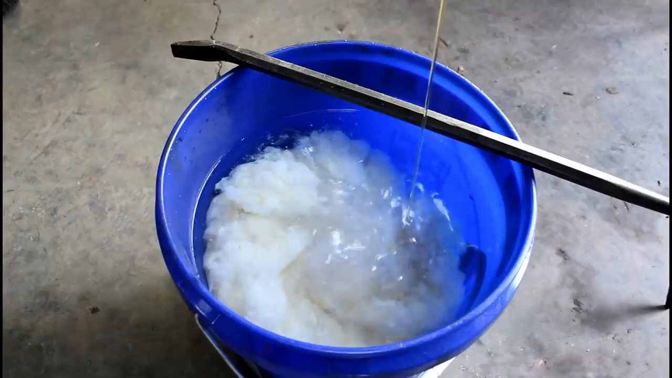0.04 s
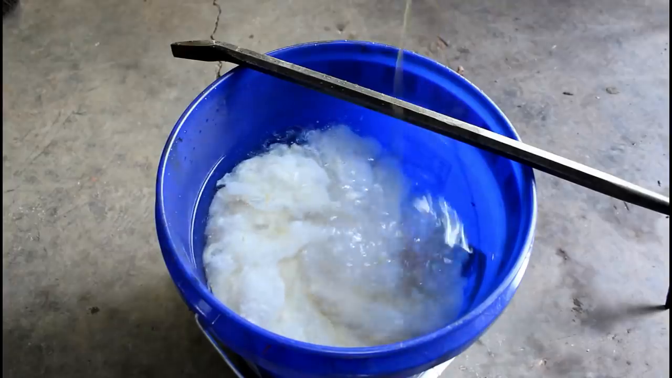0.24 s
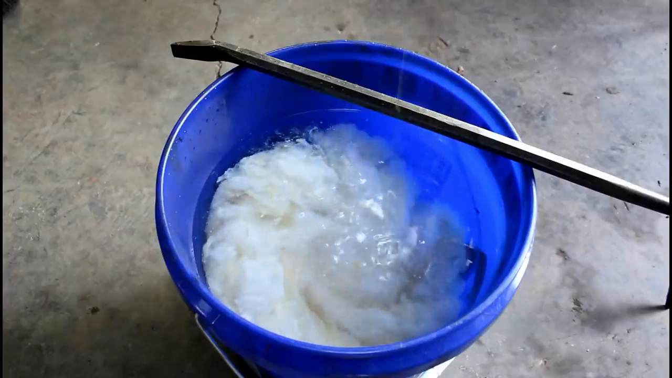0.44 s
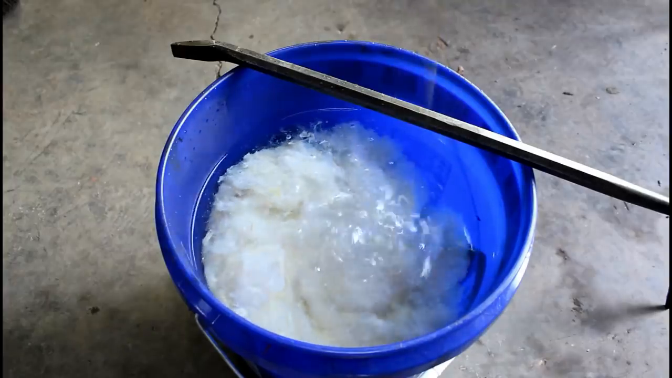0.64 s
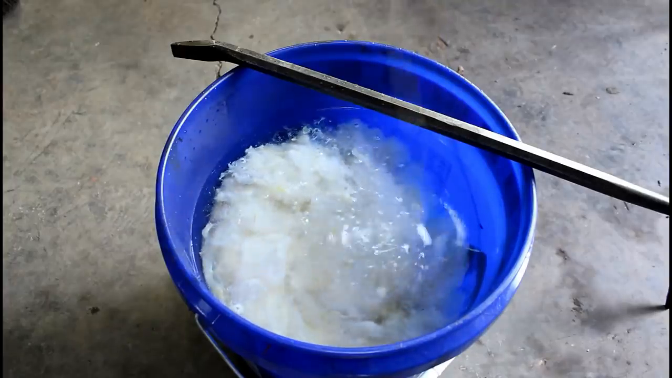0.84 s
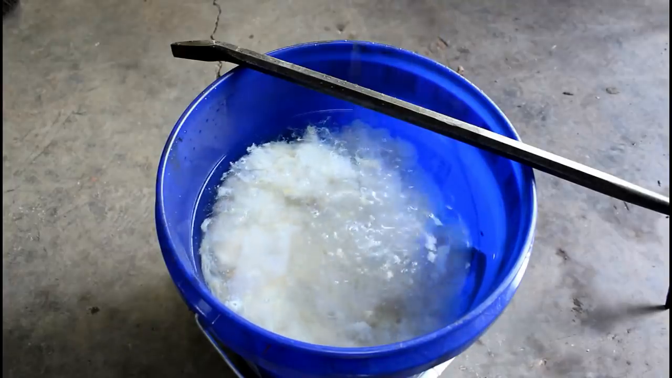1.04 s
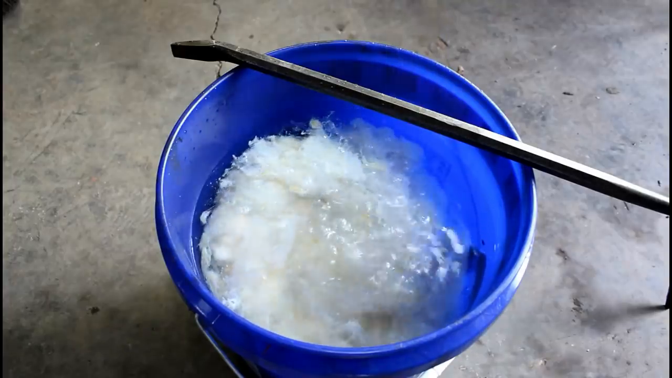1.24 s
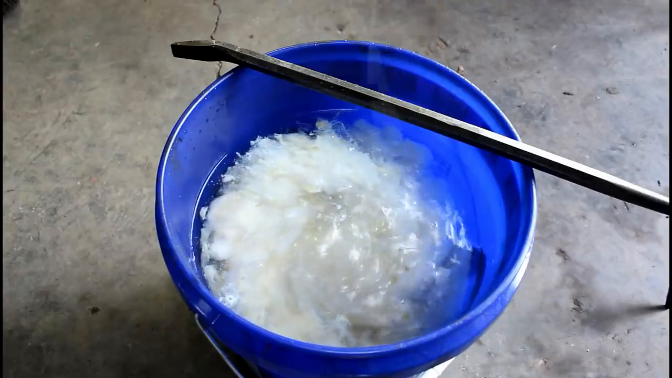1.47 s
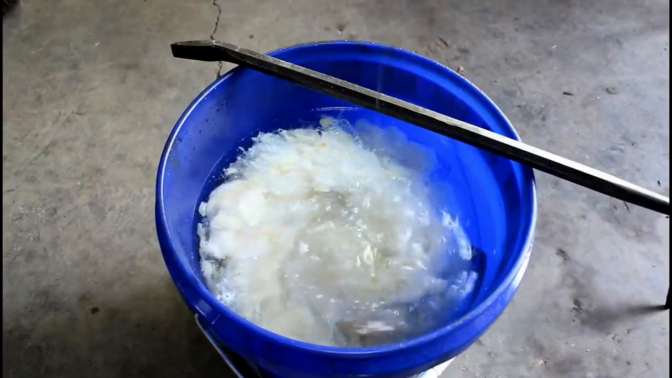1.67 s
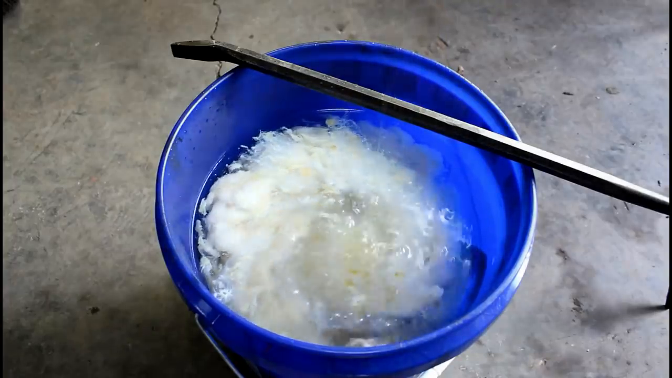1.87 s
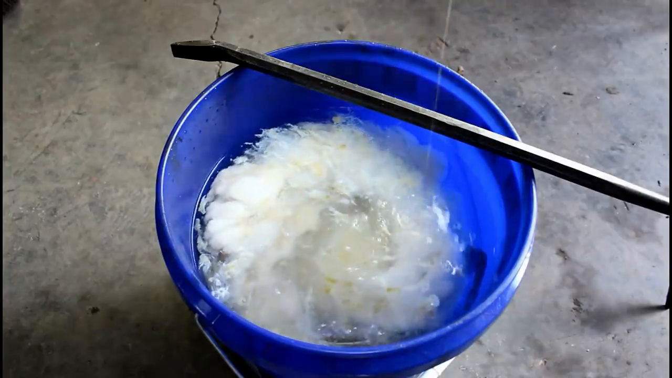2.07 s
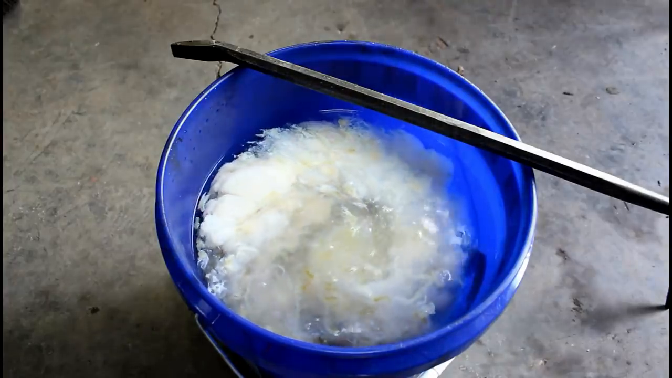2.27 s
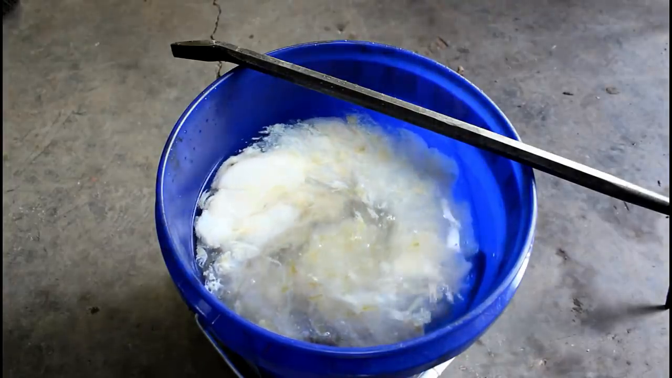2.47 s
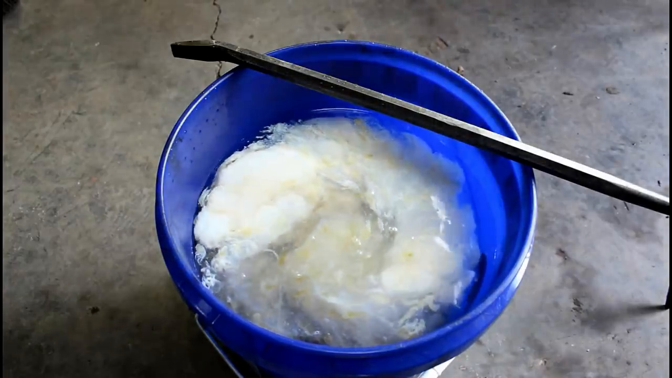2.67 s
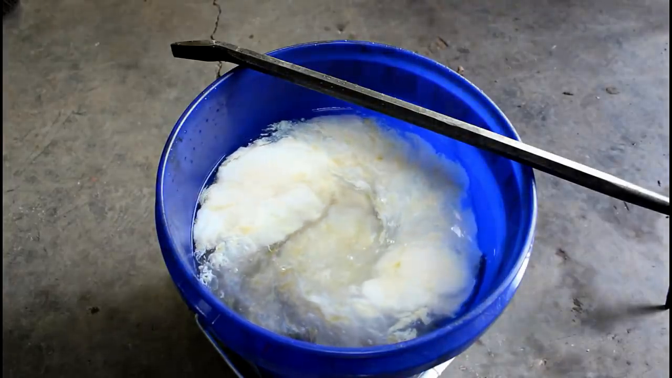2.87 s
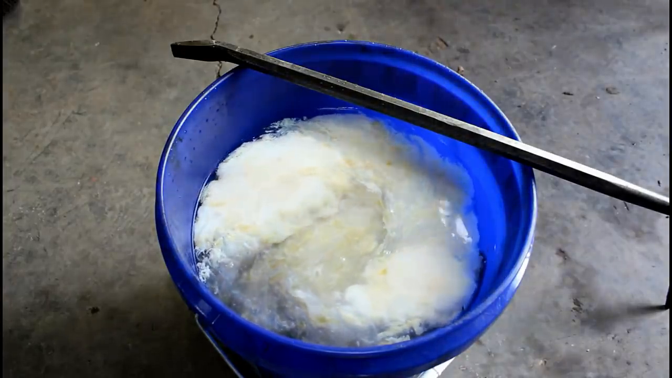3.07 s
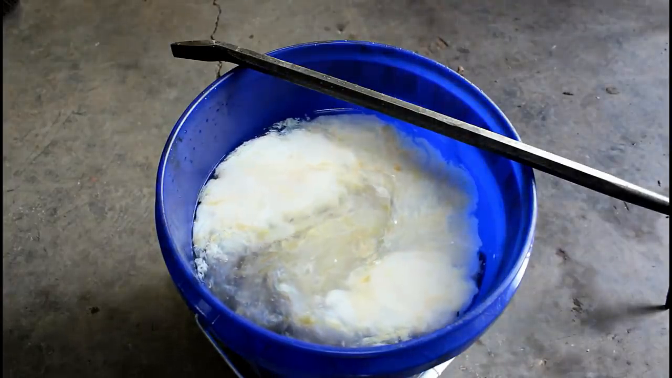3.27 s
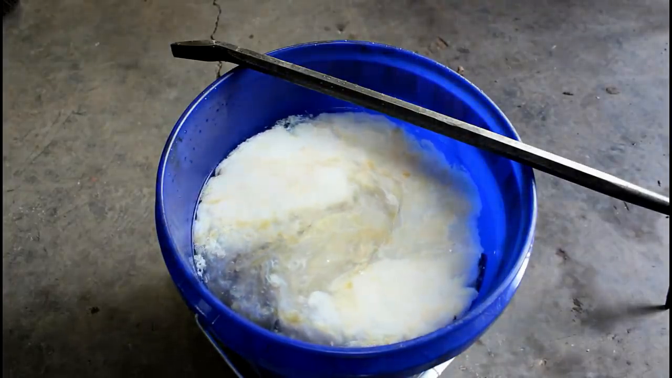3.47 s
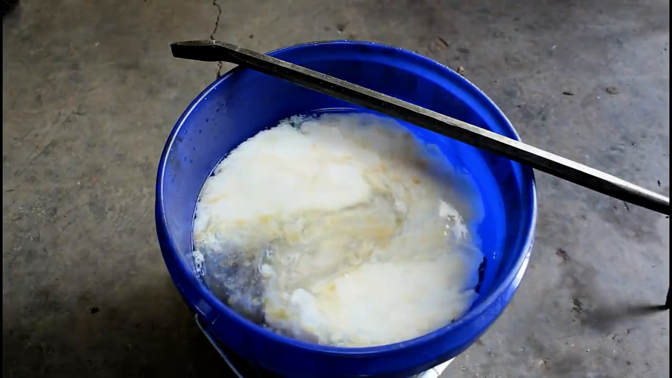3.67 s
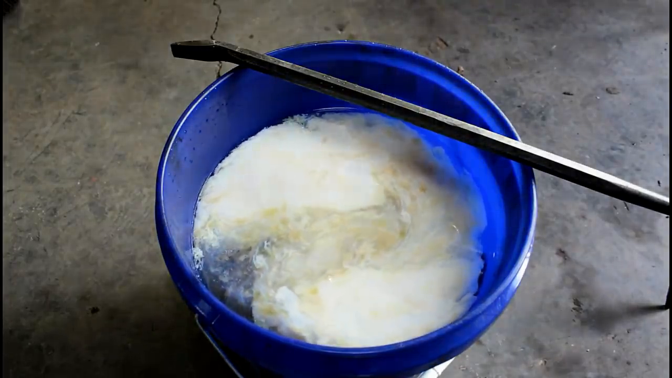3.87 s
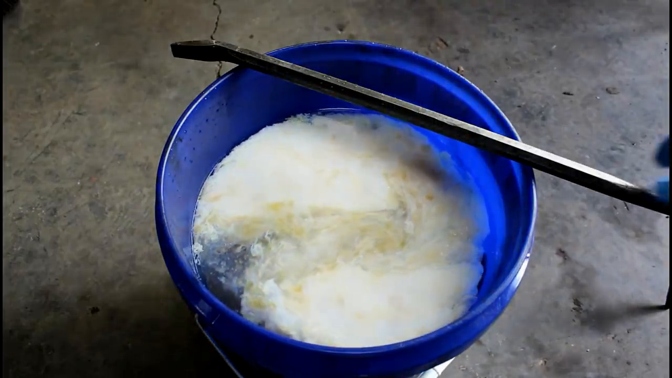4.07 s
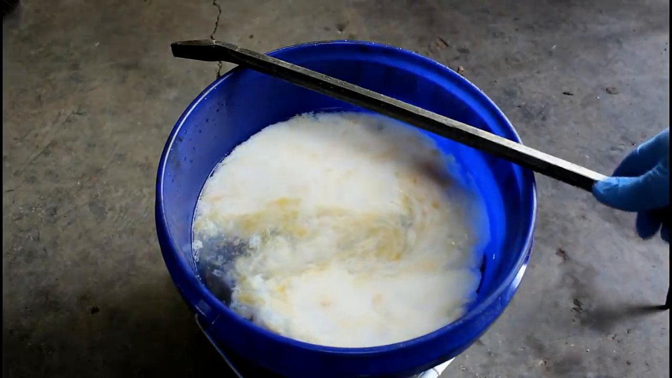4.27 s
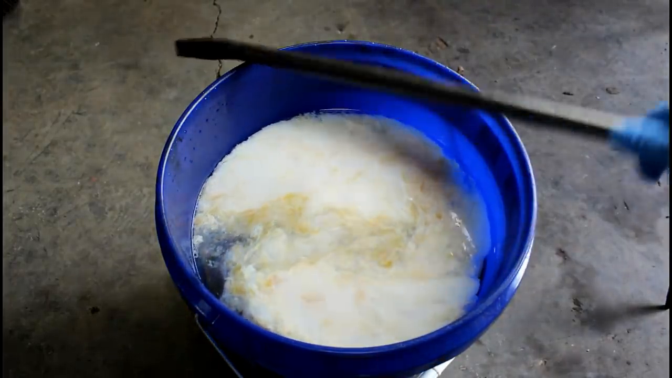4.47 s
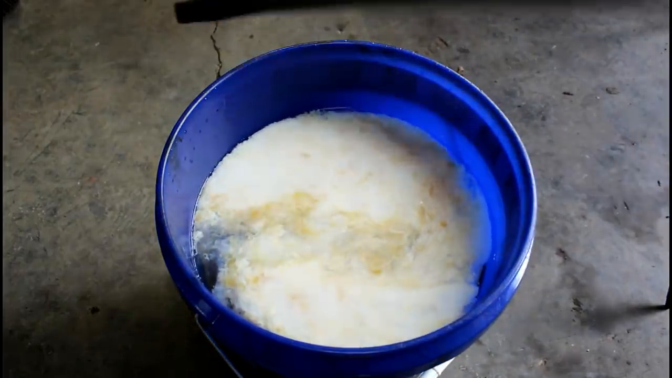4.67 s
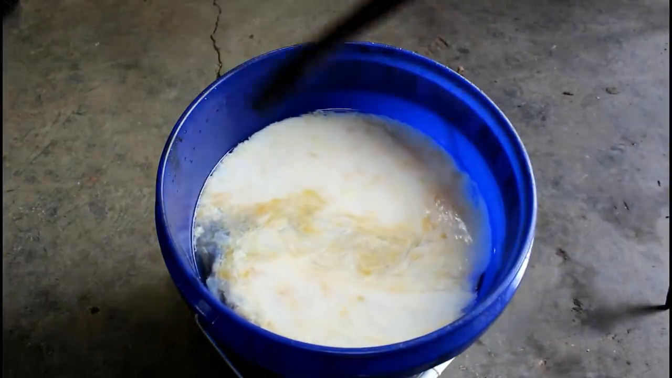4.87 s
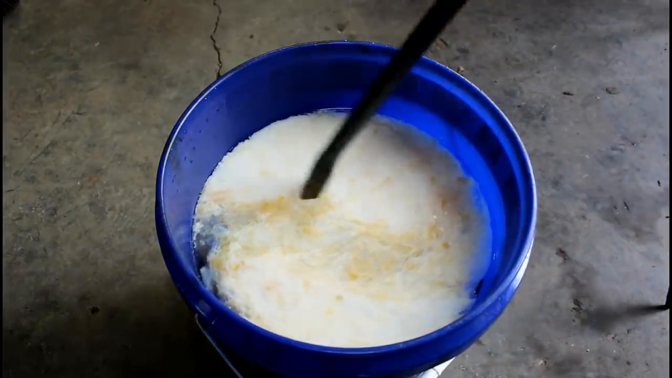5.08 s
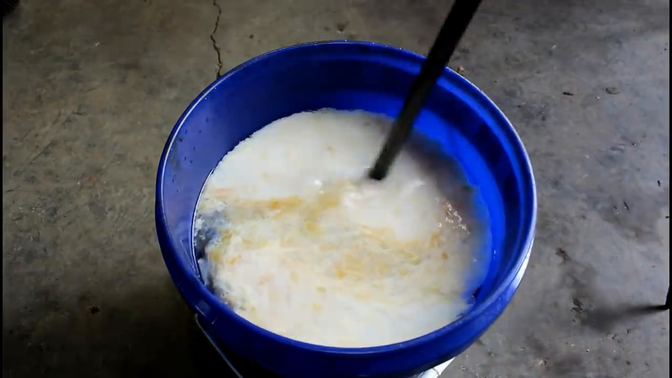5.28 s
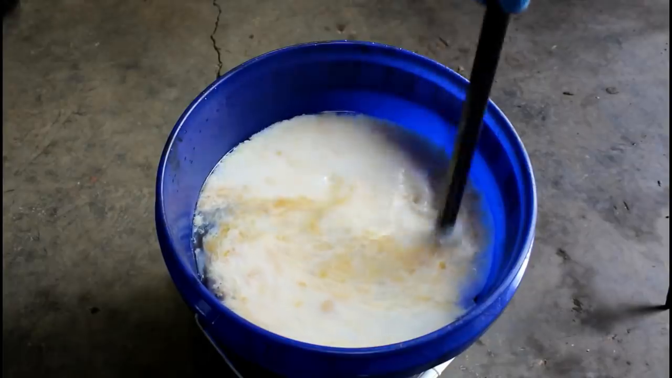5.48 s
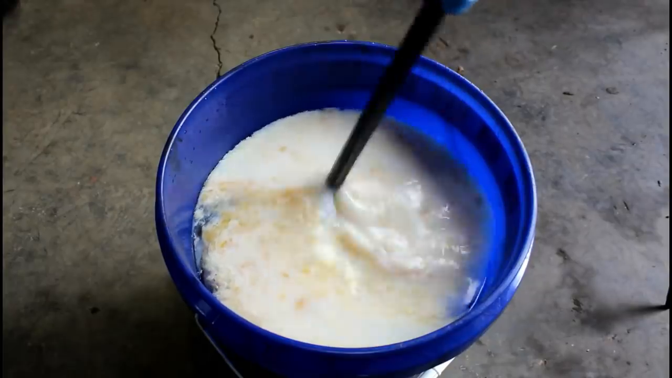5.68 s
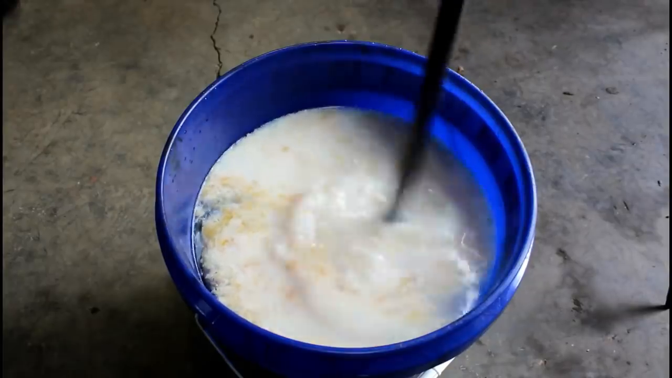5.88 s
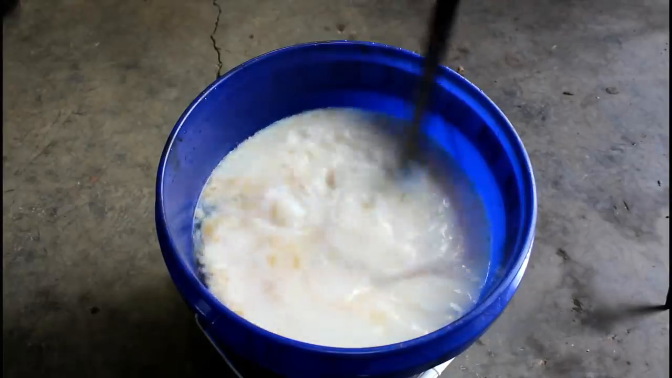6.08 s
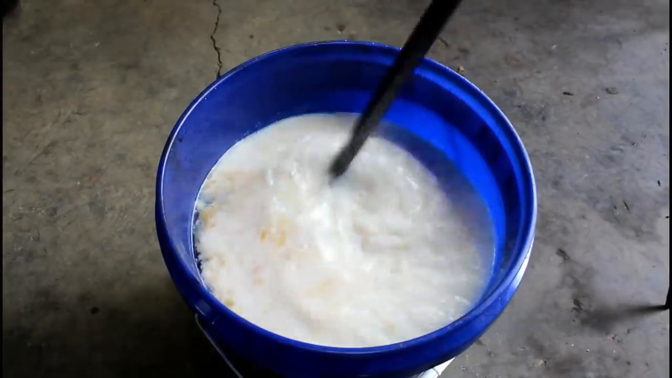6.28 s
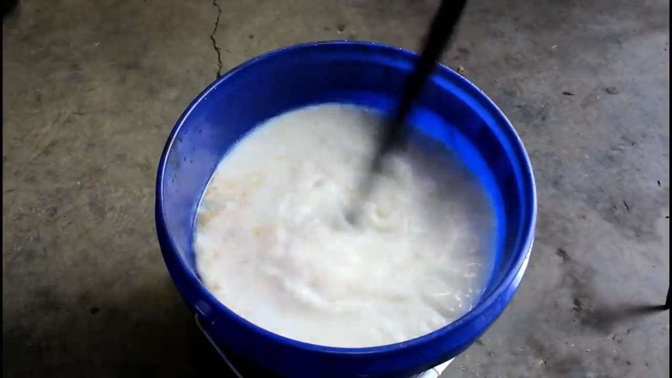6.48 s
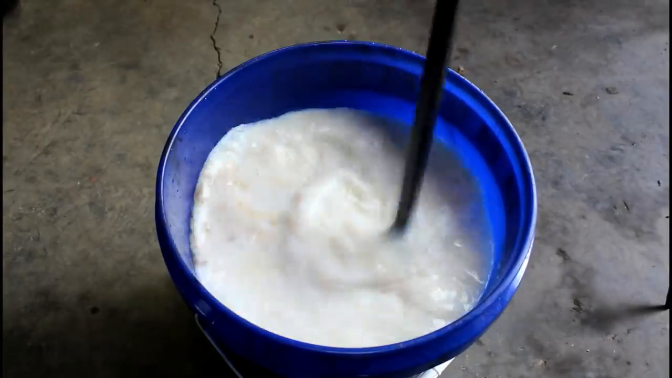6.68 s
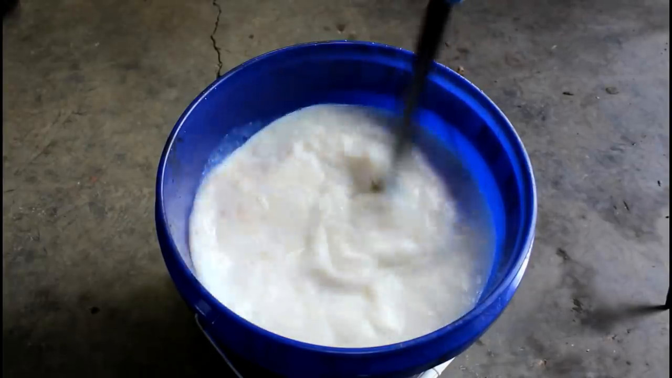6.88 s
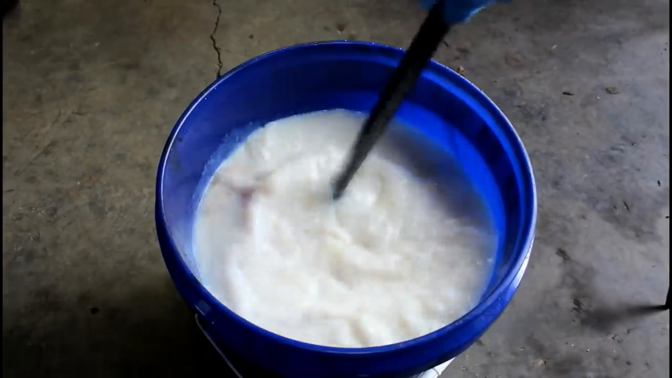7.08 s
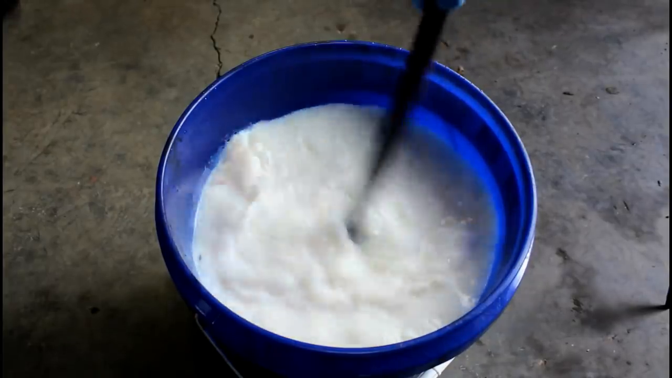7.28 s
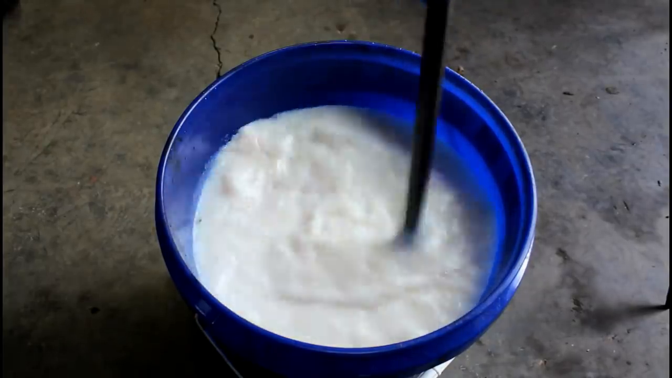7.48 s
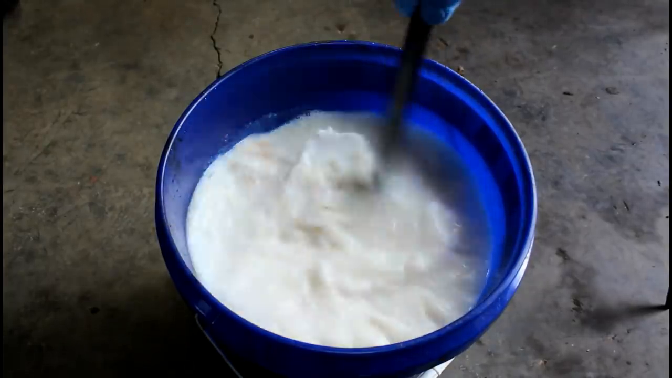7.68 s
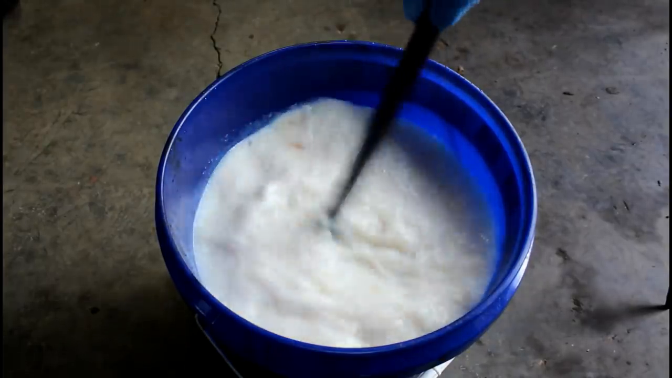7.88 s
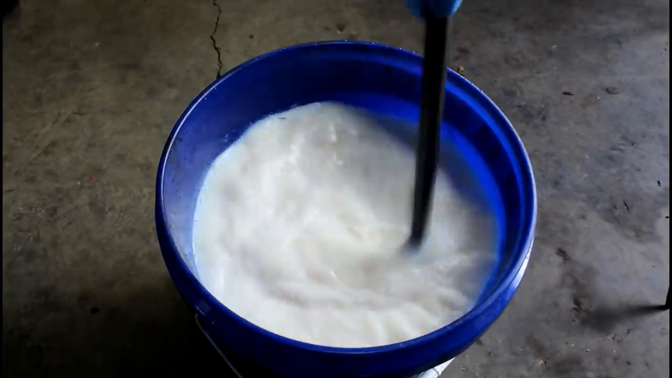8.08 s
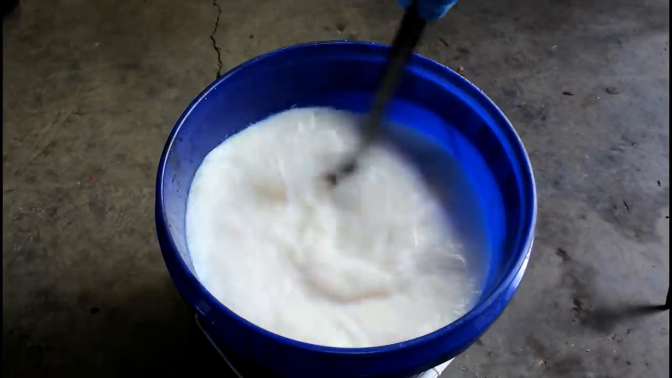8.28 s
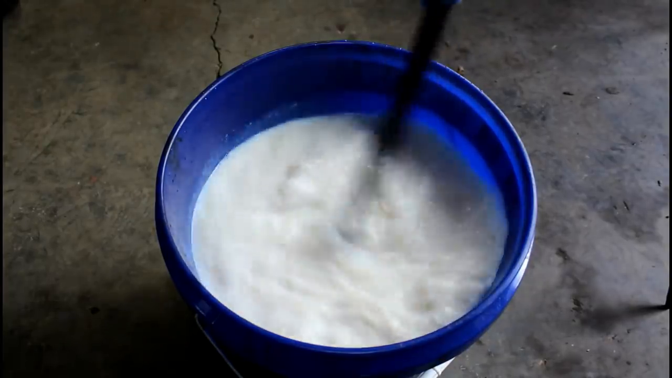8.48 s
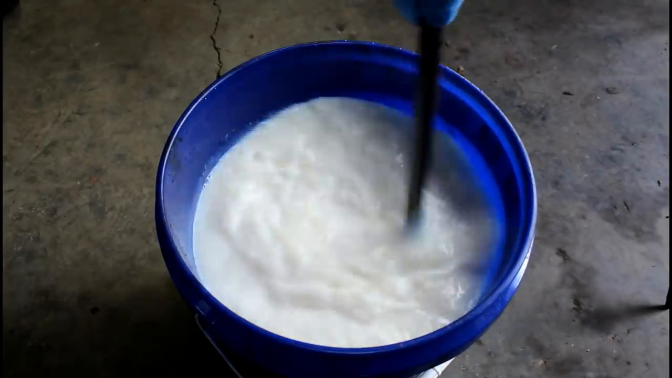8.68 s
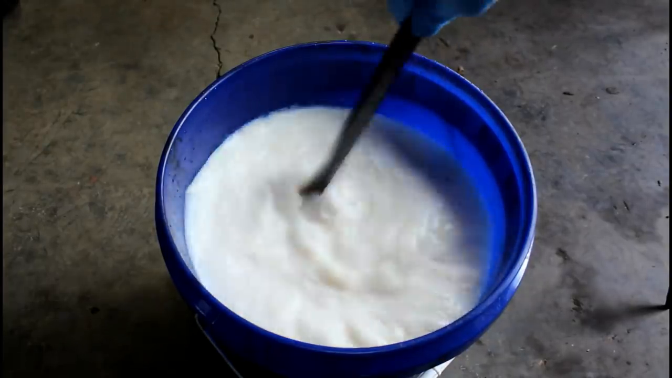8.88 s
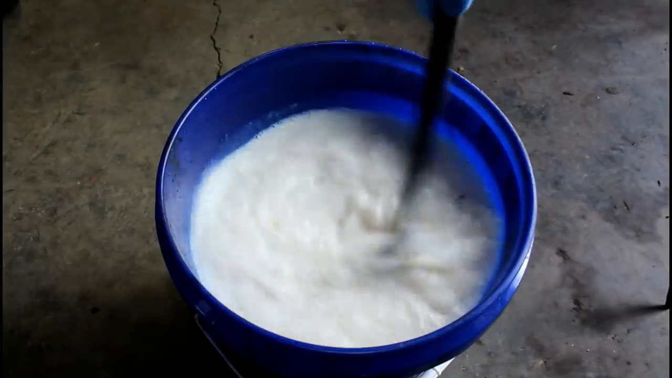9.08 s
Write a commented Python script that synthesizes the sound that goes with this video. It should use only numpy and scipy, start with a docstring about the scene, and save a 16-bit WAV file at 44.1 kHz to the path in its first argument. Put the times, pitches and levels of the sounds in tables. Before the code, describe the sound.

Thin drips tick and plink into a bucket of water, a bar scrapes off the rim, then vigorous stirring sloshes and gurgles loudly.

```python
"""The last of a liquid dribbles into a plastic bucket of water. A steel bar then scrapes and knocks off
the rim, and after a few stray drips it stirs the bucket hard, dragging air pockets under.
A workshop hums softly throughout. The water is made of pockets of air that tick and ring, the bar of
filtered noise and ringing wall tones, and the workshop of shaped noise with wavering tones."""
import sys
import numpy as np
from scipy import signal
from scipy.io import wavfile
from scipy.ndimage import uniform_filter1d

SR = 44100
rng = np.random.default_rng(int(sys.argv[2]) if len(sys.argv) > 2 else 0)


def wav_out(sig):
    """Save sig, one row per channel (or a flat mono array), as 16-bit PCM at SR to the path in sys.argv[1]."""
    wavfile.write(sys.argv[1], SR, np.round(np.clip(np.atleast_2d(sig).T, -1, 1) * 32767).astype(np.int16))


N = 402633  # length in samples


def gain_of(db):
    """Turns decibels into a factor to multiply by."""
    return 10 ** (np.asarray(db) / 20)


def evened(x):
    """Scales a signal to an rms (average strength) of 1."""
    return x / np.sqrt(np.mean(x ** 2) + 1e-20)


def read(points, hz):
    """Reads a table of levels by pitch, with pitch on a log scale."""
    f, value = np.transpose(points)
    return np.interp(np.log(hz + 1), np.log(f + 1), value)


def curve(rows):
    """Draws a table of levels over time as a line in dB, silent outside it."""
    s, db = np.transpose(rows)
    return np.interp(np.arange(N) / SR, s, db, -200, -200)


def add(mix, s, sound):
    """Mixes a sound in, starting at s seconds."""
    part = mix[round(s * SR):][:len(sound)]
    part += sound[:len(part)]


def lowpass(x, hz, order=2):
    """Keeps what lies below a pitch."""
    return signal.sosfilt(signal.butter(order, hz, fs=SR, output="sos"), x)


def band(x, lo_hz, hi_hz):
    """Keeps what lies between two pitches."""
    return signal.sosfilt(signal.butter(2, [lo_hz, hi_hz], "band", fs=SR, output="sos"), x)


def drift(hz):
    """A random wander no faster than about hz, with an rms of 1."""
    return evened(lowpass(rng.standard_normal(N), hz))


# The thin stream and its fizz. Each row: time in seconds, relative level in dB.
STREAM_LEVEL = [(.3, -61), (.9, -54), (1.95, -51.5), (2.3, -56)]
# Tones of the air above the water. Each row: pitch in Hz, width in Hz, level in dB against the water.
BUCKET_AIR = [(452, 58, -9), (964, 120, -5)]
CHURN_LAG_S = 0.008  # the spray flies first, the large pockets close behind the bar a moment later
CHURN_FALL_DB_PER_S, SPRAY_FALL_DB_PER_S = 169, 287
CHURN_LULL_DB, SPRAY_LULL_DB = -44, -51.5  # the water never quite settles between surges


def water():
    """Drips, stream fizz and the churned water; the air in the bucket rings along."""
    churn_db = surges(CHURN_LAG_S, CHURN_FALL_DB_PER_S, CHURN_LULL_DB, level_column=2)
    spray_db = surges(0, SPRAY_FALL_DB_PER_S, SPRAY_LULL_DB, level_column=3)
    stream_db = curve(STREAM_LEVEL)
    stirred = swarm(churn_db - 3.0, spray_db + 2.5, per_s=520, spread_db=3, lowest_hz=391.1)
    # froth: pockets too dense to tell apart
    froth = swarm(churn_db - 7, spray_db - 10, per_s=2500, spread_db=1.5, lowest_hz=420, count=24)
    poured = swarm(stream_db, stream_db, per_s=120, spread_db=3, lowest_hz=2500, tick_db=-6, count=12)
    # spatter: flung droplets landing
    droplet_db = (churn_db + spray_db) / 2 - 6
    spatter = swarm(churn_db, droplet_db, per_s=110, spread_db=5.5, lowest_hz=5500, tick_db=-2, count=10)
    crowd = stirred + froth + spatter + poured
    air = sum(gain_of(db) * band(crowd, hz - width / 2, hz + width / 2) for hz, width, db in BUCKET_AIR)
    return pockets() + crowd + air


# Surges of water as the bar ploughs through and turns. Each row: start in seconds, hold in seconds,
# relative level in dB of the churn of large pockets, relative level in dB of the spray of small ones.
BAR_SURGES = [(5.526, 0.012, -59, -40), (5.64, 0.046, -44.5, -39), (5.68, 0.03, -34.5, -34),
              (5.732, 0.01, -28, -37), (6.009, 0.021, -32.5, -28.5), (6.093, 0.053, -31.5, -62),
              (6.153, 0.059, -29.5, -29.5), (6.254, 0.092, -30.5, -31.5), (6.426, 0.039, -26.5, -33.5),
              (6.56, 0.02, -34, -32), (6.688, 0.012, -27, -32), (6.819, 0.053, -28, -33),
              (6.943, 0.082, -30, -28), (7.085, 0.036, -30.5, -32.5), (7.205, 0.067, -27, -39),
              (7.324, 0.069, -32.5, -34), (7.399, 0.09, -31.5, -30), (7.524, 0.016, -32, -31),
              (7.634, 0.12, -26.5, -27.5), (7.793, 0.051, -23.5, -26.5), (7.912, 0.05, -28.5, -31.5),
              (8.088, 0.039, -27.5, -39), (8.185, 0.11, -27.5, -37.5), (8.364, 0.057, -25.5, -29),
              (8.546, 0.075, -23, -33.5), (8.696, 0.04, -26.5, -28.5), (8.887, 0.088, -30, -30),
              (8.997, 0.045, -27, -32), (9.056, .05, -30, -30)]
RISE_S = 0.0083  # every surge swells this fast


def surges(lag_s, fall_db_per_s, lull_db, level_column):
    """Level over time in dB: each surge swells, holds and dies away; their powers add over the lull."""
    t = np.arange(N) / SR
    power = np.full(N, gain_of(lull_db) ** 2)
    first_s = BAR_SURGES[0][0]
    first = int(first_s * SR)
    for row in BAR_SURGES:
        start_s, hold_s = row[:2]
        since = t[first:] - lag_s - start_s
        fading_db = fall_db_per_s * np.maximum(since - RISE_S - hold_s, 0)
        swell = np.clip(since / RISE_S, 0, 1)
        power[first:] += (swell * gain_of(row[level_column] - fading_db)) ** 2
    return np.where(t > first_s, 10 * np.log10(power), -200)  # silent before the first surge


# Loudness of the many small pockets by pitch. Each row: pitch in Hz, relative level in dB.
SWARM_TONE = [(340, -5.5), (450, 6), (1000, 1), (2400, 3), (5000, -5.5), (7800, -2), (12000, -38.5)]


def swarm(low_db, high_db, per_s, spread_db, lowest_hz, tick_db=-21, count=40):
    """Many random pockets in clumps, at count pitches; large ones follow low_db, small ones high_db."""
    active = np.flatnonzero(low_db > -150)  # skip the silent stretches
    low_db, high_db = low_db[active], high_db[active]
    clumps = gain_of(8.0 * drift(30)[active])
    out = np.zeros(N)
    for hz in np.geomspace(lowest_hz, 11000, count):
        small = np.clip(np.log(hz / 900) / np.log(4.0), 0, 1)  # 0 for large pockets, 1 for small ones
        chance = per_s * (hz / 2000) ** .4 / count / SR  # small pockets are more numerous
        draw = rng.random(len(active)) / (chance * clumps)
        at = np.flatnonzero(draw < 1)  # a pocket sounds here
        size = np.zeros(len(active))
        size[at] = np.clip(draw[at], .02, 1) ** (-spread_db * np.log(10) / 20)  # few are loud
        size = evened(size)
        size[at] *= gain_of((1 - small) * low_db[at] + small * high_db[at])

        # four shapes at each pitch; the moment a pocket sounds decides which one it gets
        cycles = rng.uniform(16.7, 51.1, 4)  # ring length, counted in swings
        rises = 1.5 * rng.random(4) ** 2 * (1 - 0.69 * small)
        grains = []
        for swings, rise in zip(cycles, rises):
            grain = bubble(hz * rng.uniform(.95, 1.05), swings / hz, rise, tick_db)
            grains.append(gain_of(read(SWARM_TONE, hz)) * grain / np.linalg.norm(grain))
        for k in at:
            add(out, active[k] / SR, size[k] * grains[k % len(grains)])
    return out / np.sqrt(count)


# The clearest air pockets, from drips and from the bar. Each row: start in seconds, starting pitch in Hz,
# level in dB, ring in milliseconds, and for those that swoop, pitch rise over the ring as a share.
CLEAR_POCKETS = [(0.857, 3770, -26, 16), (0.8603, 1340, -21, 22), (0.8605, 6100, -20, 6),
                 (0.873, 1340, -35, 110), (0.881, 6530, -15, 4), (1.0101, 1250, -26, 22),
                 (1.022, 1110, -35, 110), (1.1339, 2500, -31, 18), (1.1663, 2030, -25, 11),
                 (1.1663, 3520, -16, 4), (1.3752, 4630, -27, 8), (1.5544, 2330, -33, 26),
                 (1.6713, 3520, -29, 6), (1.7607, 3070, -26, 9), (1.8131, 740, -39, 130, 0.4),
                 (1.8575, 3290, -31, 18), (1.888, 1300, -41, 170), (1.9, 1700, -37, 40),
                 (1.9199, 4040, -26, 5), (2.0526, 2000, -39, 18), (2.1478, 2860, -32, 17),
                 (2.2122, 1900, -26, 15), (5.2175, 6000, -31, 3), (5.224, 5500, -29, 4),
                 (5.2588, 2900, -31, 3), (5.2585, 6800, -11, 2.5), (5.5377, 1770, -30, 34),
                 (5.63, 3250, -23, 14), (5.666, 1350, -26, 18), (5.682, 2400, -18, 9),
                 (5.705, 580, -28, 48, .7), (5.7055, 1900, -14, 36), (5.754, 1750, -24, 55),
                 (5.7558, 450, -19, 90), (5.788, 450, -16, 42, 0.9), (5.822, 900, -34, 32, 2.3),
                 (5.848, 680, -30, 42, 1.2), (5.876, 1800, -33, 14, 1.1), (6.007, 1300, -29, 20, 1.3),
                 (6.0201, 2330, -17, 16), (6.0482, 550, -11, 16), (6.12, 510, -20, 27, 1.0),
                 (6.169, 3500, -18, 10), (6.1833, 950, -11, 45), (6.186, 450, -16, 20, 1.0),
                 (6.24, 3000, -18, 14), (6.2715, 7200, -14, 5), (6.294, 1350, -25, 36, .8),
                 (6.304, 490, -17, 30), (6.3695, 7000, -19, 4), (6.447, 2250, -21, 18),
                 (6.449, 720, -18, 24), (6.4738, 1260, -14, 10), (6.5745, 5000, -1, 3.5),
                 (6.7, 600, -22, 50, 0.4), (6.785, 650, -25, 35, 1), (6.808, 3200, -23, 9),
                 (6.8373, 1900, -16, 20), (6.8483, 510, -9, 26), (6.886, 520, -18, 22, 0.8),
                 (6.8912, 2500, -12, 15, 0.4), (6.919, 2400, -17, 14), (6.9614, 2800, -8, 16),
                 (7.116, 500, -21, 50), (7.204, 820, -13, 22), (7.212, 1000, -17, 12, 1.1),
                 (7.215, 3100, -18, 14), (7.232, 1700, -19, 35), (7.2362, 440, -18, 80),
                 (7.2388, 3070, -13, 12), (7.4015, 1800, -10, 26), (7.442, 500, -21, 120),
                 (7.443, 1260, -16, 30), (7.4595, 3070, -8, 4), (7.474, 2400, -17, 16),
                 (7.6456, 1020, -18, 40), (7.6519, 1900, -18, 22), (7.6911, 1170, -23, 45),
                 (7.724, 1440, -18, 30), (7.8041, 830, -20, 55), (7.832, 490, -12, 55),
                 (7.882, 550, -18, 20, .7), (7.925, 900, -24, 28, 1), (7.9598, 450, -13, 27),
                 (7.9693, 4630, -15, 8), (8.1065, 2500, -7, 9), (8.1131, 1770, -12, 34),
                 (8.1545, 430, -21, 60), (8.2562, 1440, -10, 26), (8.3006, 420, -21, 70, 0.5),
                 (8.3784, 2180, -9, 10, 0.4), (8.4103, 3520, -14, 11, 0.4), (8.4224, 510, -13, 23, 0.4),
                 (8.4234, 950, -12, 70), (8.4346, 380, -18, 45, .6), (8.4731, 1020, -14, 37),
                 (8.475, 3200, -16, 14), (8.5633, 3290, -15, 18), (8.6114, 1340, -13, 9),
                 (8.644, 980, -19, 50), (8.7181, 3770, -14, 6), (8.7385, 3770, -9, 6),
                 (8.7402, 510, -8, 30), (8.749, 850, -16, 22), (8.7751, 450, -13, 65),
                 (8.846, 1300, -30, 36, .6), (8.898, 450, -22, 110), (8.9643, 2500, -17, 24),
                 (9.0079, 4320, -7, 9), (9.085, 500, -20, 35, .9)]
# Single droplets smacking the surface. Each row: start in seconds, level in dB.
SMACKS = [(0.489, -32), (0.7297, -27.5), (0.7958, -37.5), (0.8695, -24.5), (0.986, -34.5), (1.0208, -33),
          (1.0354, -27), (1.3615, -36), (1.443, -36), (1.4597, -33), (1.5183, -31.5), (1.6184, -25),
          (1.938, -34), (1.9771, -25.5), (2.0918, -35), (2.2122, -33.5), (5.2218, -37)]


def pockets():
    """The pockets and droplets that stand out one by one; a droplet is mostly tick."""
    out = np.zeros(N)
    for s, hz, db, ring_ms, *swoop in CLEAR_POCKETS:
        rise = swoop[0] if swoop else 0.15
        add(out, s, gain_of(db) * bubble(hz, ring_ms / 1000, rise, tick_db=-16))
    for s, db in SMACKS:
        add(out, s, gain_of(db) * bubble(rng.uniform(6930, 8200), 0.005, 0, tick_db=0.6))
    return out


def bubble(hz, ring_s, rise, tick_db):
    """A pocket of air pinches off with a tick and rings; its pitch climbs as it nears the surface."""
    t = np.arange(int(ring_s * SR) + 64) / SR
    shake, spatter = rng.standard_normal((2, len(t)))

    # large pockets and those that swoop upward open gradually
    swell_s = ring_s * (.04 + .05 * rise ** 2) + 1.5 / hz
    opening = 1 - np.exp(-t / swell_s)
    # a swooping pocket keeps its strength until it bursts
    fall_db = 60 / (1 + max(rise - .4, 0) * 7)
    ending = np.clip(4 * (1 - t / ring_s), 0, 1)  # fades out over the last quarter
    shape = gain_of(-fall_db * t / ring_s) * opening * ending

    wobble = 0.4 * np.cumsum(shake) * np.sqrt(hz / SR)  # the pocket is not round
    climb = rise * t ** 3 / ring_s ** 2 / 3
    ring = shape / shape.max() * np.sin(2 * np.pi * hz * (t + climb) + wobble)

    # a burst of noise dying within a few dozen samples, with its bass and top softened
    tick = np.convolve(spatter * np.exp(-t * SR / 16), np.repeat([.5, -.5], 3), "same")
    return ring + gain_of(tick_db) * tick


# Knocks of the bar leaving the rim. Each row: start in seconds, relative level in dB.
RIM_KNOCKS = [(4.525, -20), (4.536, -21.5), (4.562, -29)]
# Scrape of the bar over the rim. Each row: time in seconds, relative level in dB.
RIM_SCRAPE = [(4.305, -75), (4.313, -46), (4.33, -59), (4.45, -58), (4.52, -48), (4.59, -50), (4.61, -75)]
# Ring of the bucket wall. Each row: pitch in Hz, relative level in dB, seconds to fall by 60 dB.
WALL_RING = [(371, -13, 0.13), (498, -5.5, 0.059), (756, -10.5, 0.013), (967, -9.5, 0.049),
             (2400, -12.5, 0.0089)]


def bar_lift():
    """The bar drags over the rim (hissing noise) and knocks the plastic wall (short tones) as it leaves."""
    t, out = np.arange(4000) / SR, np.zeros(N)
    ring = sum(gain_of(db - 60 * t / t60) * np.sin(2 * np.pi * hz * t) for hz, db, t60 in WALL_RING)
    for s, db in RIM_KNOCKS:
        add(out, s, gain_of(db) * ring)
    drag = gain_of(curve(RIM_SCRAPE)) * rng.standard_normal(N)
    hiss = gain_of(6.0) * band(drag, 5600, 7900)
    late = np.arange(N) > 4.4 * SR  # the lower rasp joins in at 4.4 s
    rasp = gain_of(12.5) * late * band(drag, 800, 2770)
    return out + hiss + rasp


def echoes(x, wall_db=-12, wall_t60=0.032, room_db=-18, room_t60=0.23):
    """Sparse taps of random sign: a quick scatter inside the bucket, then the longer, duller room."""
    length = SR // 2
    t, taps = np.arange(length) / SR, np.zeros(length)
    at = np.arange(60, length - 20, 20)
    taps[at + rng.integers(0, 20, len(at))] = rng.choice([-1., 1.], len(at))
    near = taps * gain_of(-60 * t / wall_t60)
    far = band(taps * (t > .008), 220, 6400) * gain_of(-60 * t / room_t60)
    tail = gain_of(wall_db) * near / np.linalg.norm(near) + gain_of(room_db) * far / np.linalg.norm(far)
    return x + signal.oaconvolve(x, tail)[:N]


# Tone of the workshop noise. Each row: pitch in Hz, relative level in dB for each Hz.
SHOP_TONE = [(15, -39), (25, -12), (93, -6.5), (140, -4), (240, -3.5), (289, -8), (433, -7.5), (762, -15.5),
             (1240, -15.5), (4260, -25.5), (8000, -31.5), (11000, -41)]
SHOP_DB = -46  # overall rms level of the noise
# Wavering tones. Each row: pitch in Hz, width in Hz, level in dB that the wavering swings around.
SHOP_HUM = [(92.7, 8.2, -62), (450, 47, -58.5)]


def shop():
    """Distant air and machines: shaped noise with slow patches, and a few wavering tones."""
    frames, hz = N // 256 + 5, np.fft.rfftfreq(1024, 1 / SR)
    a, b, patches = rng.standard_normal((frames, 513, 3)).T
    # smooth the patches across pitch, then across time
    patches = uniform_filter1d(patches, 10, 0)
    patches = evened(uniform_filter1d(patches, 20, 1))  # about 1 dB up or down
    spectrum = (a + 1j * b) * gain_of(read(SHOP_TONE, hz)[:, None] + patches)
    noise = signal.istft(spectrum, nperseg=1024, noverlap=768)[1][:N]
    out = gain_of(SHOP_DB) * evened(noise)
    for f, width, db in SHOP_HUM:
        tone = evened(band(rng.standard_normal(N), f - width / 2, f + width / 2))
        out += gain_of(db + 3.1 * drift(0.47)) * tone
    return out


def scene():
    """Water and bar echo in bucket and room, over the workshop; the small bucket radiates little bass."""
    inside = water() + bar_lift()
    bright = signal.sosfilt(signal.butter(4, 340, "high", fs=SR, output="sos"), inside)
    boom = gain_of(1) * band(inside, 155, 200)  # one low boom of the bucket walls
    return (echoes(bright + boom) + shop())[None]


EDGE_HZ = 15700  # nothing much passes above this


def record(dry):
    """The microphone dulls the top octave and adds its own faint hiss; then the band limit."""
    soft = lowpass(dry, 10500, order=4)
    soft = soft + gain_of(-74) * rng.standard_normal(dry.shape)
    limit = signal.firwin(511, EDGE_HZ, window=("kaiser", 9), fs=SR)
    return signal.oaconvolve(soft, limit[None], "same")


dry = scene()
out = record(dry)
wav_out(out)
```